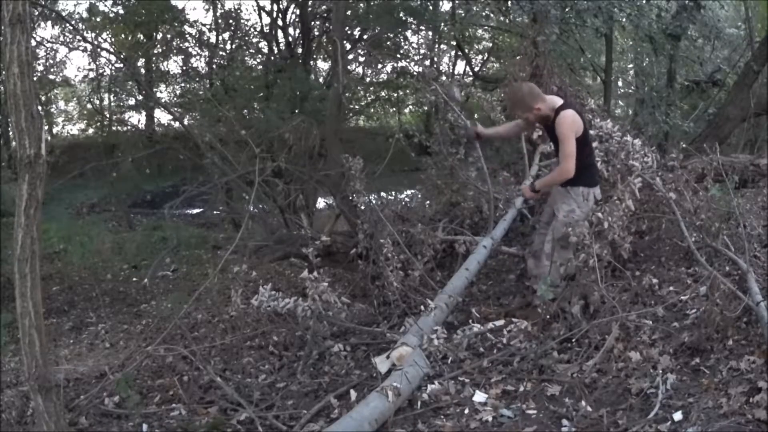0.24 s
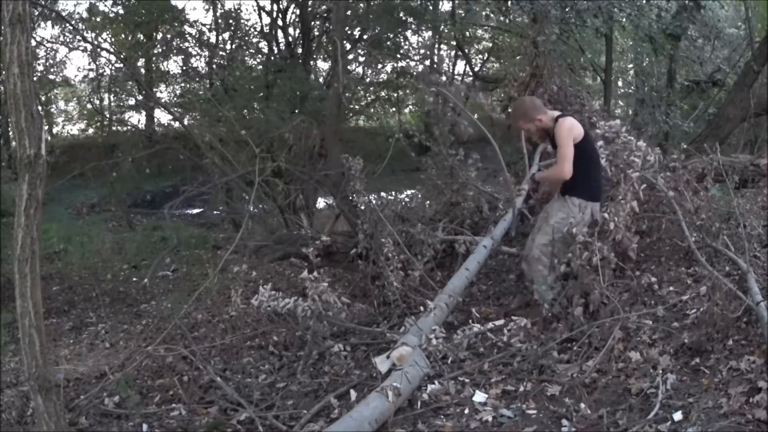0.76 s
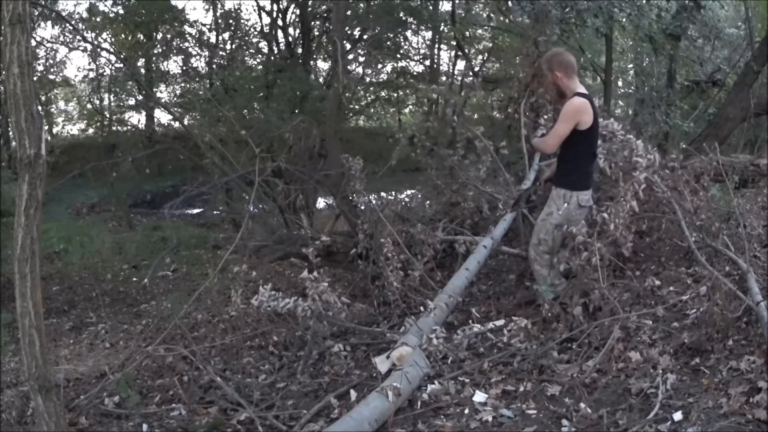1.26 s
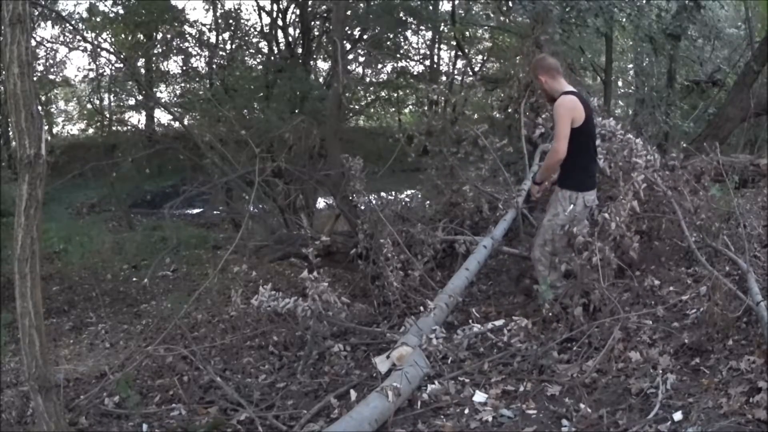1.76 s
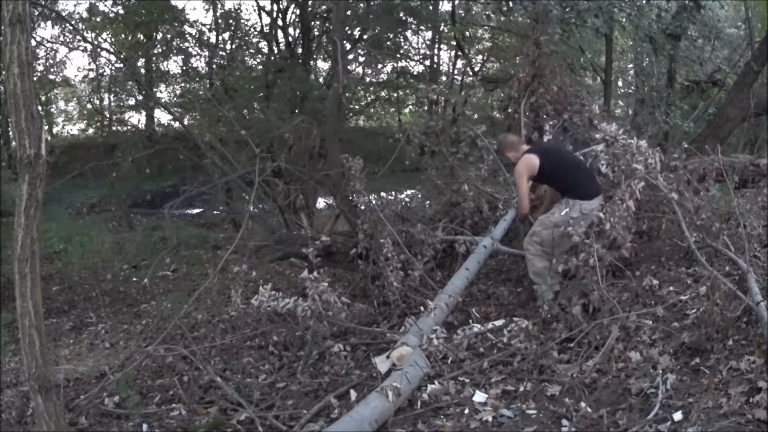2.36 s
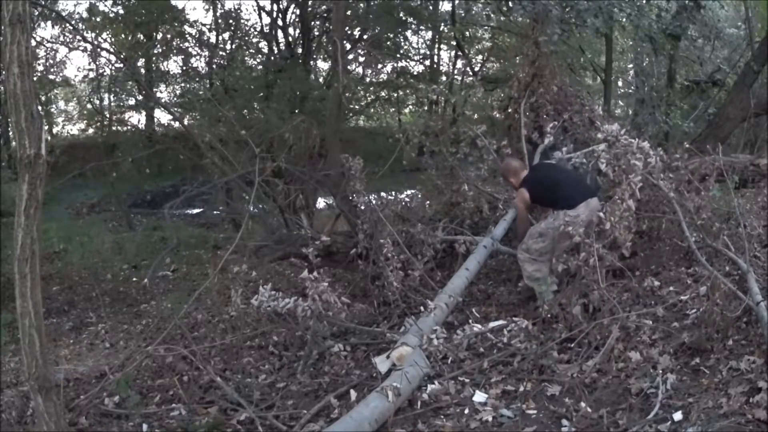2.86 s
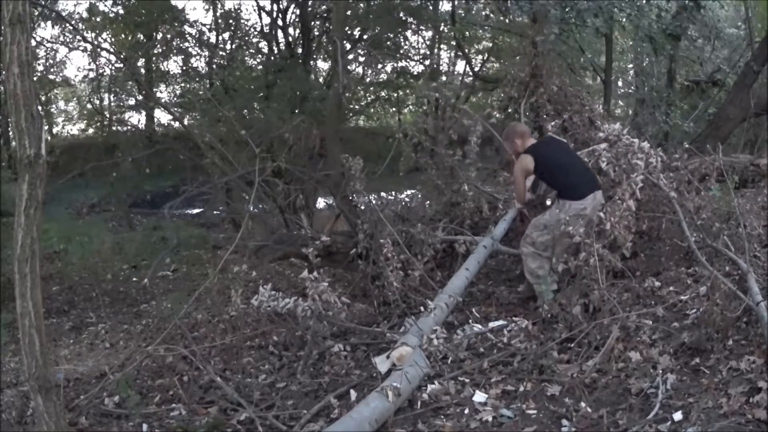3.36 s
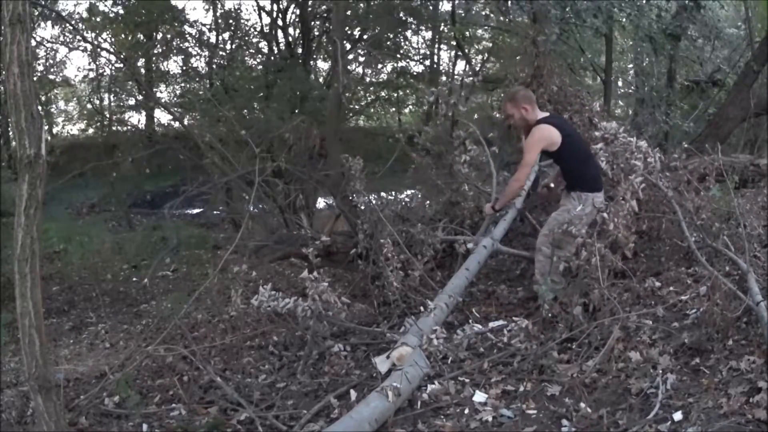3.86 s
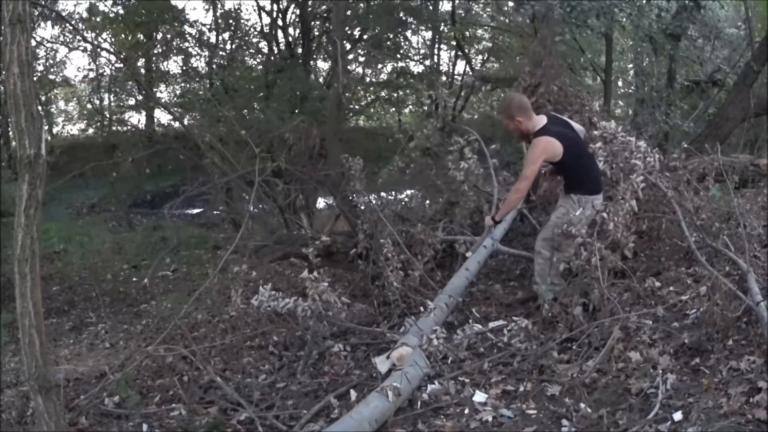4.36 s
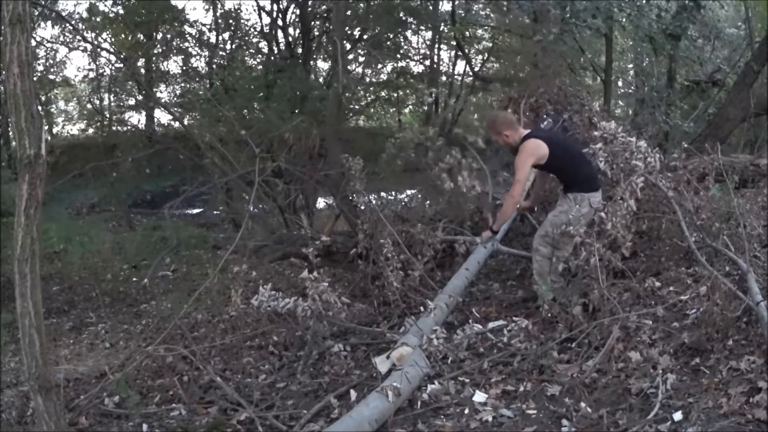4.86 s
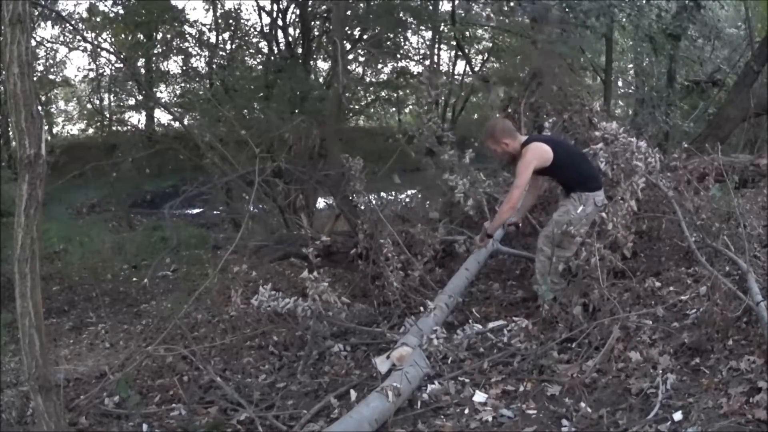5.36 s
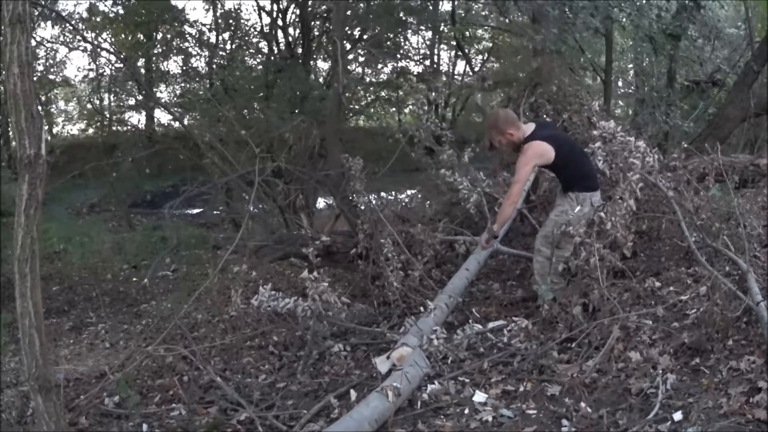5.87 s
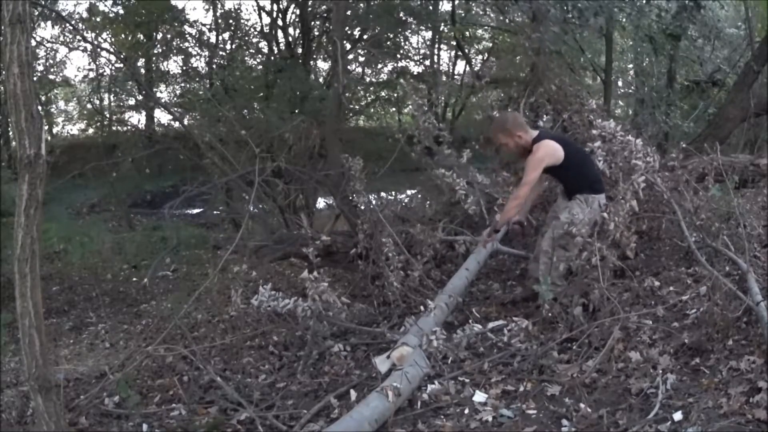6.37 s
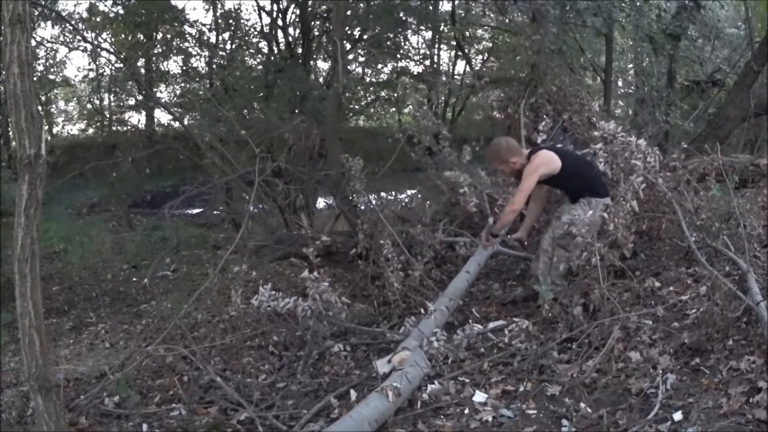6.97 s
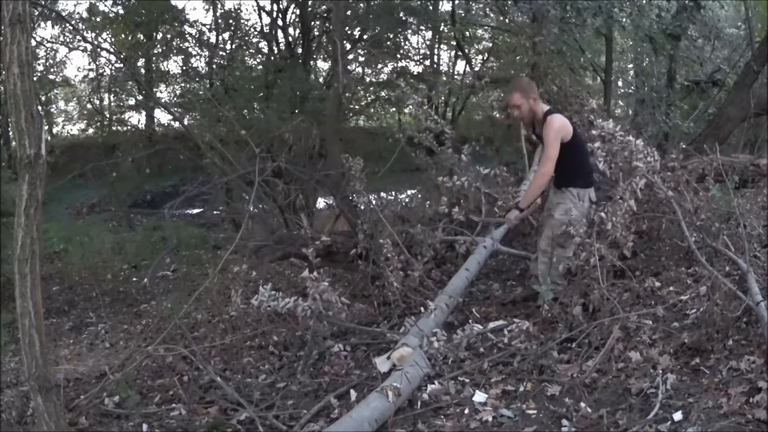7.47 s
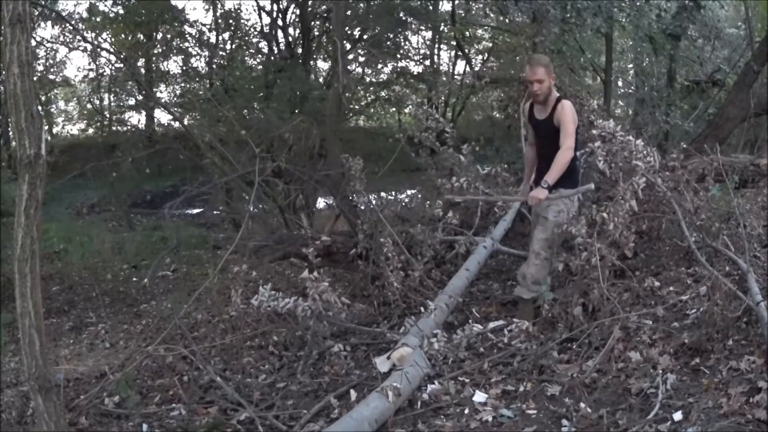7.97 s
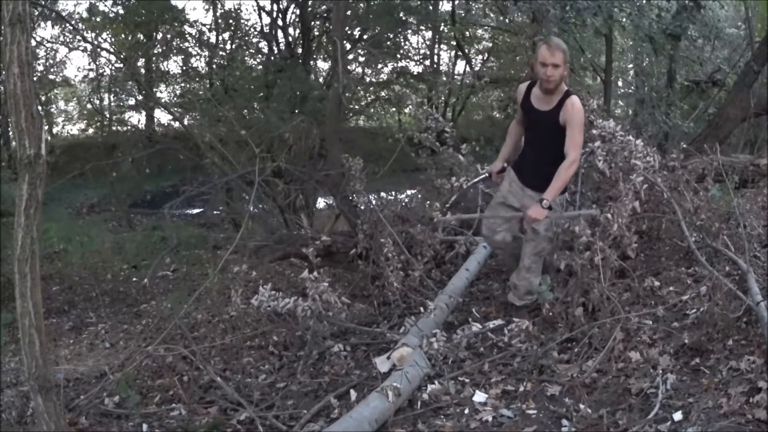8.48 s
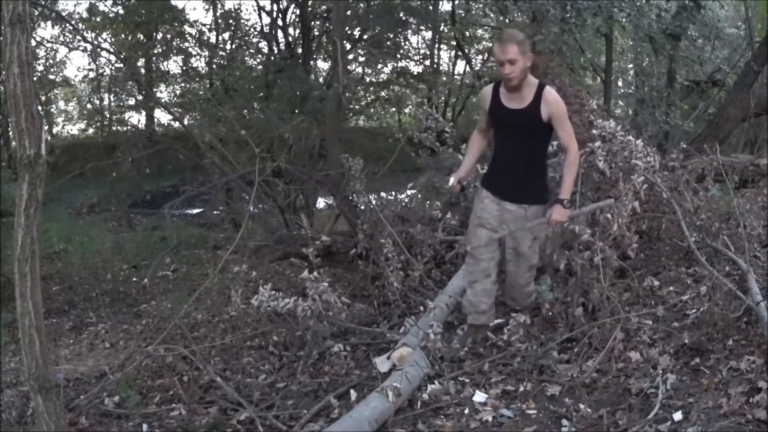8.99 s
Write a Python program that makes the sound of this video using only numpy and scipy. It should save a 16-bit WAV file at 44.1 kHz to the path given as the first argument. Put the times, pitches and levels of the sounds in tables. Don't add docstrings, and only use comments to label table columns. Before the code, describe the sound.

Dry branches and dead leaves crackle in gusts as a brush pile is jerked and dragged, twigs snapping sharply over a faint outdoor hum.

```python
import sys
import numpy as np
from scipy import signal
from scipy.fft import rfft, irfft, next_fast_len
from scipy.io import wavfile
from scipy.ndimage import uniform_filter1d

SR = 44100
rng = np.random.default_rng(int(sys.argv[2]) if len(sys.argv) > 2 else 0)


def pcm_store(signal):
    levels = np.round(np.clip(np.atleast_2d(signal), -1, 1) * 32767)
    wavfile.write(sys.argv[1], SR, levels.astype(np.int16).T)


def to_linear_factor(level_db):
    exponent = np.asarray(level_db, float) / 20
    return 10 ** exponent


N = 407043
PULL_SCRAPE_DB = -19
CONTROL_STEP = 16


def evened(x):
    return x / np.sqrt(np.mean(x ** 2) + 1e-20)


def read(points, hz):
    f, value = np.transpose(points)
    return np.interp(np.log(hz + 1), np.log(f + 1), value)


def passed(x, order, hz, kind):
    return signal.lfilter(*signal.butter(N=order, Wn=hz, btype=kind, fs=SR), x)


def add(mix, s, sound):
    part = mix[round(s * SR):][:len(sound)]
    part += sound[:len(part)]


def strung(events, source):
    track = np.zeros(N)
    for s, *row in events:
        add(track, s, source(*row))
    return track


def shake(start_s, db, swell_s, hold_s, fade_db_per_s):
    t = np.arange(0, N, CONTROL_STEP) / SR - start_s
    climb_db = 14 * np.minimum(t / swell_s - 1, 0)
    fade_db = fade_db_per_s * np.maximum(t - swell_s - hold_s, 0)
    return (t >= 0) * to_linear_factor(db + climb_db - fade_db) ** 2


def shaking():
    # t/s, leaf level/dB, hold/s, fade/(dB/s), stem scrape re leaves/dB
    jerks = [(0.0, -26, 0.013, 83, -19), (0.61, -16.5, 0.029, 65, -17), (1.01, -19, 0.056, 40, -20),
             (1.195, -23.5, 0.013, 74, -25), (1.425, -30.5, 0.15, 84, -19.5),
             (2.279, -29, 0.15, 200, -15.5), (2.47, -32, .01, 52, -19), (2.627, -21.5, 0.039, 82, -18),
             (3.082, -26, 0.13, 40, -19), (3.373, -26, 0.023, 152, -16.5), (3.48, -22.5, 0.032, 60, -18),
             (4.585, -29, 0.055, 223, -19), (4.744, -16, 0.41, 53, -21.5), (5.944, -32.5, 0.2, 302, -18.5),
             (6.177, -15.5, 0.078, 103, -20), (6.752, -36, 0.16, 200, -20), (6.956, -14.5, 0.062, 93, -17),
             (7.373, -43, 0.038, 155, -24), (7.887, -44, .06, 100, -22), (8.2, -35.5, .05, 100, -28),
             (8.554, -33.5, 0.016, 149, -22), (8.8, -23.5, 0.025, 100, -20), (9.06, -29.5, .2, 101, -20.5)]
    # t/s, leaf level/dB, swell/s, hold/s, fade/(dB/s)
    pulls = [(0.29, -29.5, 0.2, 0.071, 196), (0.579, -20.5, 0.04, 0.42, 45), (1.203, -32.5, 0.16, 0.25, 40),
             (1.598, -23.5, 0.16, 0.089, 100), (1.842, -22, 0.067, 0.042, 203),
             (1.944, -29, 0.084, 0.19, 76), (2.552, -27.5, 0.078, .01, 200),
             (2.855, -32.5, 0.14, 0.088, 90), (3.204, -42, 0.071, 0.38, 198), (3.498, -18, 0.22, 0.27, 200),
             (3.978, -17.5, 0.047, 0.21, 117), (4.25, -26.5, 0.11, 0.11, 50),
             (5.296, -26, 0.057, 0.14, 124.5), (5.512, -31.5, 0.069, 0.24, 64),
             (6.304, -31, 0.13, 0.032, 41), (7.1, -33.5, 0.093, 0.3, 200), (7.533, -38.5, 0.073, .1, 100),
             (7.696, -31, 0.078, .03, 150), (7.803, -36, 0.12, 0.42, 50), (8.155, -34.5, 0.13, 0.05, 44),
             (8.397, -32.5, 0.052, 0.042, 252), (8.602, -39.5, 0.11, 0.16, 100),
             (8.785, -17, 0.069, 0.043, 264), (8.935, -29.5, 0.036, 0.021, 120)]
    rest_db, jerk_rise_s = -44, 0.002
    power = sum(shake(*row) for row in pulls) + to_linear_factor(rest_db) ** 2
    stems = power * to_linear_factor(PULL_SCRAPE_DB) ** 2
    for s, db, hold_s, fade_db_per_s, jerk_scrape_db in jerks:
        jerk = shake(s, db, jerk_rise_s, hold_s, fade_db_per_s)
        power = power + jerk
        stems = stems + jerk * to_linear_factor(jerk_scrape_db) ** 2
    at, points = np.arange(N), np.arange(0, N, CONTROL_STEP)
    level_db = np.interp(at, points, 10 * np.log10(power))
    scrape_db = np.interp(at, points, 10 * np.log10(stems / power))
    dull_db = -8 + 0.04 * (level_db + 27) + 0.4 * (scrape_db - PULL_SCRAPE_DB)
    return level_db, scrape_db, dull_db


def wander(hz):
    band = signal.butter(N=1, Wn=[hz / 4, hz], btype="band", fs=SR / CONTROL_STEP)
    slow = signal.lfilter(*band, rng.standard_normal(N // CONTROL_STEP + 2))
    return evened(np.interp(np.arange(N) / CONTROL_STEP, np.arange(len(slow)), slow))


def jolts(per_s, fade_s):
    kicks = (rng.random(N) < per_s / SR) * np.minimum(rng.exponential(1, N), 2)
    return signal.lfilter([1], [1, -np.exp(-1 / (fade_s * SR))], kicks)


def ringing(x, depth_db):
    z = signal.stft(x, nperseg=512)[2]
    patches = uniform_filter1d(rng.standard_normal(z.shape), size=2, axis=0)
    patches = uniform_filter1d(patches, size=5, axis=1)
    return signal.istft(z * to_linear_factor(depth_db * evened(patches)), nperseg=512)[1][:N]


def leaves(level_db, scrape_db, dull_db):
    # f/Hz, density/dB
    spectrum = [(180, -54), (300, -12), (439, -27), (504, -20.5), (705, -23), (1340, -22.5), (4400, -2),
                (8100, -3), (10800, 0.5), (11500, -22.5), (15000, -50), (22000, -120)]
    bands = np.zeros((3, N))
    sparse = np.clip((-18.5 - level_db) / 14, 0.2, 1)
    clump = to_linear_factor(sparse * 0.64 * wander(15.4)) * (1 + 0.13 * sparse * jolts(90, 0.013))
    for hz in np.geomspace(330, 11000, num=25):
        t = np.arange(round(6 * SR / hz) + 8) / SR
        tick = np.sin(2 * np.pi * hz * t) * (hz * t) * np.exp(-hz * t / 0.66)
        luck = rng.random(N) / (0.35 * hz / SR)
        at = np.flatnonzero(luck < 1)
        size = np.zeros(N)
        size[at] = (-1.) ** at * to_linear_factor(1.3 * np.minimum(-np.log(luck[at] + 1e-9), 5))
        size[at] *= clump[at] * to_linear_factor(1.77 * wander(17.8)[at])
        grain = evened(signal.oaconvolve(size, tick)[:N])
        bands[np.searchsorted([1700, 3500], hz)] += to_linear_factor(read(spectrum, hz)) * np.sqrt(hz) * grain
    stems, twigs, fizz = (evened(ringing(b, depth_db=1.0)) for b in bands)
    scrape_db, dull_db = np.minimum(scrape_db, -9), np.minimum(dull_db, -3)
    sheen = signal.filtfilt(*signal.butter(N=1, Wn=6500, btype="high", fs=SR), fizz)
    fizz = fizz + (to_linear_factor(0.4 * (PULL_SCRAPE_DB - scrape_db)) - 1) * sheen
    rustle = to_linear_factor(level_db) * (fizz + to_linear_factor(dull_db - 3.0) * twigs + to_linear_factor(scrape_db + 1.0) * stems)
    return passed(rustle, 4, 492, "high")


def air(rustle_db):
    # f/Hz, density/dB
    spectrum = [(12, -43), (30, -6), (60, 2.5), (90, -2.5), (292, -1), (664, -1), (710, -2.5), (968, -1),
                (1380, -5), (2870, -15.5), (3070, -8.5), (4000, -14), (5200, -49), (8800, -120)]
    # t/s, level/dB
    hum_course = [(0.0, -50), (1.8, -49.5), (3.2, -51.5), (4.2, -51.5), (4.72, -50.5), (4.82, -57), (5.2, -56),
                  (5.8, -53.5), (6.9, -52), (7.4, -53), (8.4, -49), (9.23, -49.5)]
    duck_from_db, duck_share, duck_s = -15.5, 0.9, 0.087
    frames, hz = N // 512 + 6, np.fft.rfftfreq(2048, 1 / SR)
    a, b, patches = rng.standard_normal((frames, 1025, 3)).T
    patches = evened(uniform_filter1d(uniform_filter1d(patches, size=8, axis=0), size=10, axis=1))
    z = (a + 1j * b) * to_linear_factor(read(spectrum, hz)[:, None] + 1.43 * patches)
    hum = signal.istft(z, nperseg=2048, noverlap=1536)[1][:N]
    keep = np.exp(-1 / (duck_s * SR))
    over_db = np.maximum(rustle_db - duck_from_db, 0)
    duck_db = duck_share * signal.lfilter([1 - keep], [1, -keep], over_db)
    hum_course_db = np.interp(np.arange(N) / SR, *np.transpose(hum_course))
    return to_linear_factor(hum_course_db - duck_db + 7.5) * evened(hum)


def breeze():
    return to_linear_factor(-68.5) * evened(passed(rng.standard_normal((2, N)), 2, 160, "low"))


def flecks(level_db):
    per_s, over_rustle_db, fade_s = 30, 11.5, 0.00091
    luck = rng.random((round(per_s * N / SR), 2))
    at, hits = (luck[:, 0] * N).astype(int), np.zeros(N)
    hits[at] = luck[:, 1] * to_linear_factor(np.minimum(level_db[at], -24) + over_rustle_db)
    fleck = rng.standard_normal(300) * np.exp(-np.arange(300) / SR / fade_s)
    return signal.oaconvolve(hits, passed(fleck, 2, 2600, "high"))[:N]


def snap(db, hz, t60_s, ring_share, first=2.6):
    # pitch factor, level/dB
    twig = [(0.996, 6), (1.44, -5), (0.75, -9), (2.04, -8.5)]
    t = np.arange(3000) / SR
    luck = rng.standard_normal((3000, 2))
    burst = to_linear_factor(-60 * (t / t60_s) ** 2.0) * (1 - np.exp(-t / 0.00035))
    tears = luck[:, 0] * (0.51 + (abs(luck[:, 1]) > 1.6)) * burst
    tears[2] = first
    t = t[:300]
    modes = sum(to_linear_factor(d) * np.sin(2 * np.pi * min(hz * k, 10500) * t) / k for k, d in twig)
    ring = np.diff(modes * np.sqrt(t) * to_linear_factor(-60 * t / 0.0052))
    rung = evened(signal.oaconvolve(tears, ring)[:3000])
    crack = evened(passed(tears, 2, [2280, 10500], "band"))
    share = np.clip(ring_share, 0, 1)
    sound = share * rung + (1 - share) * crack
    peak = np.sqrt(2 * uniform_filter1d(sound ** 2, size=90).max())
    return to_linear_factor(db - 4.5) * sound / peak


def snaps():
    # t/s, peak/dB, f/Hz, ring share/(0-1)
    snap_events = [(0.216, -20, 3450, 0.33), (0.546, -12.5, 7650, .05), (0.6027, -7, 4450, .4),
                   (0.741, -11, 4140, 0.9), (1.109, -10, 8200, 1), (1.915, -9.5, 4830, 0.6),
                   (1.942, -8.5, 8400, 0.9), (2.121, -8, 7000, .2), (2.2006, -14.5, 8900, 0.2),
                   (2.915, -16, 2940, 0.7), (3.0888, -14.5, 6000, 0), (3.3863, -15, 5000, 0.3),
                   (3.5234, -8, 2920, 0.34), (3.6123, -15, 4540, 0.2), (3.685, -12, 7890, 0.2),
                   (4.633, -14.5, 4230, 0.6), (4.7493, -12, 7960, 0.7), (5.573, -16, 6000, 0.7),
                   (5.638, -19, 5900, 0.5), (5.644, -16, 5860, 0.7), (5.6763, -19, 7600, 0.9),
                   (5.975, -35, 8500, 0.5), (6.17, -10, 5000, 0.1), (6.951, -10.5, 5430, 0.2),
                   (7.3272, -18, 2650, 0.46), (7.48, -20, 2950, 0.7), (8.076, -18.5, 5100, 0.1),
                   (8.114, -26, 4730, 0.1), (8.56, -19, 3720, 0.4), (8.799, -10, 4700, .3),
                   (9.0743, -16, 8690, 0.5)]
    return strung([(s, db, hz, 0.015, ring) for s, db, hz, ring in snap_events], snap)


def slipping():
    # t/s, jump of the rustle/dB
    slips = [(0.2868, 4), (0.3835, 11), (0.7402, 4.1), (1.1923, 1), (1.4218, 5), (1.6384, 6), (1.883, 6),
             (2.0583, 2), (2.1173, 4), (2.3603, 9), (2.4641, 10), (2.4846, 7), (2.5948, 3), (2.6283, 2),
             (3.0826, -1), (3.2799, 5), (3.6086, 2), (3.6585, 4.5), (3.6853, 6), (3.9721, 3), (4.1252, 5),
             (4.4427, 9), (4.6035, 7.0), (4.7356, 3), (5.5696, 5), (5.6736, 6), (5.714, 8), (5.7265, 11),
             (5.8522, 4.1), (5.9686, 2), (6.4078, 7.3), (6.6366, 10), (6.723, 5.0), (6.8578, 7), (7.252, 1),
             (7.5523, 9), (7.617, 4.8), (7.6662, 4.9), (7.6829, 4.9), (7.7642, 3), (7.8323, 6),
             (7.9199, 4.7), (7.9752, 3.6), (8.1591, 1), (8.5375, 8.2), (8.5583, 1), (8.6114, 5.8),
             (8.7276, 4), (8.7641, 11), (8.7935, 1), (8.832, 2), (8.8468, 1), (9.0707, 3.7), (9.1268, 7.5),
             (9.2004, 6.6)]
    brace_s, fade_s, brace_share, lead = 0.0092, 0.015, 0.68, 2000
    t, out_db = np.arange(-lead, 4000) / SR, np.zeros(N + 6000)
    shape = np.where(t < 0, -brace_share * np.exp(t / brace_s), (1 - brace_share) * np.exp(-t / fade_s))
    for s, jump_db in slips:
        add(out_db, s, jump_db * shape)
    return to_linear_factor(out_db[lead:][:N])


def ticks():
    # t/s, peak/dB, f/Hz
    tick_events = [(.325, -26.5, 8600), (.5055, -25, 5750), (1.195, -19.5, 4200), (1.4222, -23, 7250),
                   (1.457, -17.5, 8670), (1.6432, -17, 3830), (2.362, -22, 8900), (2.488, -19, 7300),
                   (2.6352, -16, 6420), (2.847, -20.5, 3440), (2.879, -21, 7890), (2.9364, -21, 2870),
                   (3.035, -19.5, 3980), (3.492, -14, 3100), (3.9747, -12, 5440), (4.0117, -18, 4464),
                   (4.446, -15, 8100), (4.5434, -20, 6090), (5.947, -25, 8200), (6.7583, -22.5, 5420),
                   (6.779, -19, 4400), (6.8145, -17.5, 6200), (6.872, -26, 6000), (7.4515, -31, 5660),
                   (7.9777, -28, 6910), (8.286, -19, 5200), (8.292, -20, 7200), (8.697, -25, 8800),
                   (9.13, -24, 7900), (9.2066, -21, 5340)]
    return strung([(*row, 0.026, 0.53) for row in tick_events], snap)


def sticks():
    # t/s, peak/dB, f/Hz
    stick_events = [(0.5937, -12, 3920), (3.6714, -10, 3780), (3.8469, -9, 4890), (3.9317, -9, 4550),
                    (3.9494, -7, 4870), (3.9894, -12, 4830), (4.041, -7, 4550), (4.0774, -6, 3170),
                    (4.1394, -12, 4870), (4.788, -11, 4490), (4.8294, -11, 4990), (4.865, -11, 4230),
                    (4.9028, -8, 2680), (4.9814, -12, 4160), (5.0117, -15, 4900), (5.0301, -13, 4400),
                    (5.0644, -10, 4980), (5.1614, -16, 4830), (5.4641, -23, 4770), (6.7974, -25, 4690),
                    (6.8084, -21, 4680), (6.8794, -28, 4900)]
    return strung([(s, db - 3, hz, 0.011, 0.39) for s, db, hz in stick_events], snap)


def catching():
    catches = [(.6015, .005, -6), (2.633, .01, -4), (3.0855, .008, -2), (3.388, 0.0074, -2),
               (3.492, .008, -4), (4.007, 0.015, -2.5), (5.015, .004, -3), (5.032, 0.0034, -4),
               (5.572, 0.0073, 0), (6.756, .01, -3), (7.482, .01, -5), (8.565, .012, -2)]
    t, sink_db = np.arange(N) / SR, np.zeros(N)
    for s, length_s, db in catches:
        near = slice(round((s - 2 * length_s) * SR), round(s * SR))
        sink_db[near] += db * np.clip(2 + (t[near] - s) / length_s, 0, 1)
    return to_linear_factor(sink_db)


def knock(db, hz, t60_s, overtones_db):
    # pitch factor, level/dB, share of t60
    limb = [(.68, -12, .5), (1, 0, 1), (1.38, -6, .6), (1.8, -7, .7), (2.5, -8, .4), (3.1, -4, .4),
            (3.65, -4, .5), (4.6, -10, .35)]
    t = np.arange(6000) / SR
    modes = np.zeros(6000)
    for k, d, share in limb:
        decay_db = 60 * (t / (t60_s * share)) ** 1.08
        modes += to_linear_factor(d + overtones_db * (k > 1) - decay_db) * np.sin(2 * np.pi * hz * k * t)
    rough = passed(rng.standard_normal(6000), 2, [260, 1500], "band")
    splinters = evened(rough) * to_linear_factor(1.5 - 60 * t / 0.016)
    sound = (modes + splinters) * (1 - np.exp(-t / 0.0016))
    return to_linear_factor(db + 7.5) * sound / abs(sound).max()


def knocks():
    # t/s, peak/dB, f/Hz, t60/s, overtones/dB
    knock_events = [(0.602, -35, 794, 0.05, -4), (1.001, -28, 348, 0.041, -10), (1.0, -30, 553, 0.033, -12),
                    (2.632, -37, 250, 0.038, -3), (4.738, -25.5, 543, 0.025, -2),
                    (5.078, -32.5, 740, 0.05, -12), (6.1709, -16, 337, 0.047, -6),
                    (6.9506, -21.5, 530, 0.028, 2), (8.1114, -33, 503, 0.025, -2),
                    (8.689, -40, 527, 0.065, -14), (8.844, -33, 840, 0.055, 9)]
    return strung(knock_events, knock)


def thud(db, hz, t60_s):
    t = np.arange(12000) / SR
    return to_linear_factor(db - 60 * t / t60_s) * np.sin(2 * np.pi * hz * t) * (1 - np.exp(-t / 0.0018))


def thuds():
    # t/s, peak/dB, f/Hz, t60/s
    thud_events = [
        (0.622, -27, 210, 0.052),
        (1.76, -44, 246, 0.58),
        (4.738, -28, 197, 0.048),
        (6.173, -28, 170, 0.1),
        (6.956, -33, 205, .15),
        (7.06, -42, 85, .3),
    ]
    return strung(thud_events, thud)


def breaks():
    # t/s, peak/dB, f/Hz, t60/s, ring share/(0-1)
    break_events = [(0.994, -20, 2500, .02, .6), (2.647, -14, 5100, 0.027, 0.5),
                    (2.918, -14, 2500, 0.012, 0.27), (6.9505, -16, 1050, 0.027, .8),
                    (6.169, -12, 1110, 0.014, 0.8), (6.763, -23, 4730, .02, .8),
                    (2.732, -14, 4250, 0.013, 0.5), (3.12, -18, 4160, 0.06, 0.8),
                    (3.134, -16, 4040, 0.066, 0.9), (4.085, -11.5, 2300, 0.041, 0.5),
                    (4.129, -13, 3020, 0.022, 0.5), (4.269, -9, 3020, 0.022, 0),
                    (4.7394, -9.5, 2830, 0.0019, 0.8), (5.031, -12, 2980, 0.036, 0.3),
                    (8.565, -20, 5060, 0.054, 0.7), (8.5677, -21, 3730, 0.06, 0.7)]
    return strung(break_events, snap)


def clicks():
    # t/s, peak/dB, f/Hz
    click_events = [(2.6338, -11, 4500), (2.9148, -17, 3300), (2.9195, -13, 4300), (3.0862, -18, 5500),
                    (3.3862, -15, 4200), (3.4912, -12, 4600), (2.121, -13, 4230), (3.959, -6, 6000),
                    (5.573, -13, 5800), (5.679, -16, 7500), (7.924, -25, 7400), (8.0752, -13, 4800),
                    (8.5612, -10, 5200), (8.5645, -14, 3600), (8.7975, -3, 4400), (4.7475, -10, 5000),
                    (3.6115, -13, 4500), (4.127, -12, 6000), (3.2304, -13, 5800), (5.7174, -24, 6500),
                    (5.972, -10, 8700), (7.4184, -22, 4860), (7.6694, -27, 9030), (7.696, -22, 7940),
                    (7.708, -22, 3110), (7.8987, -24, 9690), (7.9194, -17.5, 7920), (7.9773, -17, 6910),
                    (8.0865, -12, 7500), (8.1118, -11, 7100), (8.1804, -22, 9500), (8.2024, -24, 7660)]
    return strung([(s, db - 3.5, hz, 0.005, 0.4, 4.9) for s, db, hz in click_events], snap)


def scattered(x):
    z = signal.stft(x, nperseg=256)[2]
    turned = z * np.exp(2j * np.pi * rng.random(z.shape))
    return np.sqrt(2) * signal.istft(turned, nperseg=256)[1][:N]


def ports(x):
    # f/Hz, lead of the left port/rad
    lead_points = [(60, -0.056), (250, -0.57), (600, -1.34), (1210, -1.6), (2930, -0.54), (4390, -0.079),
                   (7840, -0.14), (11900, -.1)]
    # f/Hz, left re right/dB
    tilt_points = [(60, 0), (140, 2), (350, 1.5), (840, -0.5), (2020, -6.5), (4870, -5.5), (11700, 0)]
    # f/Hz, likeness of the ports/(0-1)
    same_points = [(40, 0.96), (300, 0.87), (600, 0.8), (1000, 0.86), (2500, 0.6), (5000, 0.85),
                   (11000, .9)]
    size = next_fast_len(N + 4096)
    hz = np.fft.rfftfreq(size, 1 / SR)
    lead, tilt = read(lead_points, hz), to_linear_factor(read(tilt_points, hz) / 2)
    same = np.clip(read(same_points, hz), 0, 1)
    shared = np.sqrt((1 + same) / 2) * rfft(x, size)
    own = np.sqrt((1 - same) / 2) * rfft(scattered(x), size)
    left = tilt * (shared + own) * np.exp(0.5j * lead)
    right = (shared - own) * np.exp(-0.5j * lead) / tilt
    middle = np.sqrt(tilt ** 2 + tilt ** -2 + 2 * same * np.cos(lead)) / 2
    return irfft(np.array([left, right]) / middle, size)[:, :N]


def scene():
    level_db, scrape_db, dull_db = shaking()
    rustle = catching() * slipping() * leaves(level_db, scrape_db, dull_db)
    bed = rustle + air(level_db) + flecks(level_db)
    wood = snaps() + ticks() + sticks() + knocks() + thuds() + breaks() + clicks()
    return ports(bed + wood) + breeze()


def top_cut(x):
    return signal.sosfilt(signal.butter(12, 12340, fs=SR, output="sos"), x)


def record(dry):
    thin = passed(dry, 2, 38, "high")
    soft = 0.75 * np.tanh(thin / 0.87)
    lowpass = signal.firwin(2001, 11030, window=("kaiser", 4), fs=SR)
    limited = signal.oaconvolve(soft, lowpass[None], "same")
    return top_cut(limited)


dry = scene()
out = record(dry)
pcm_store(out)
```